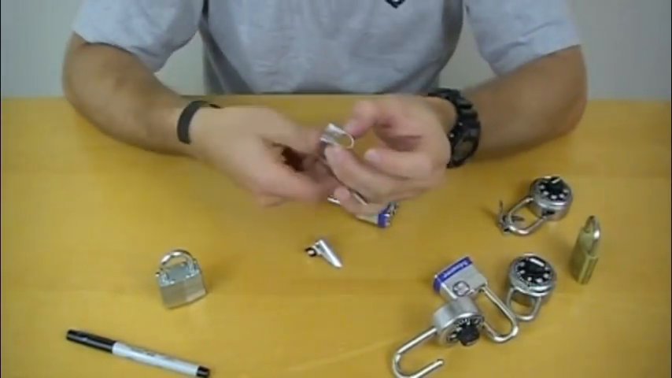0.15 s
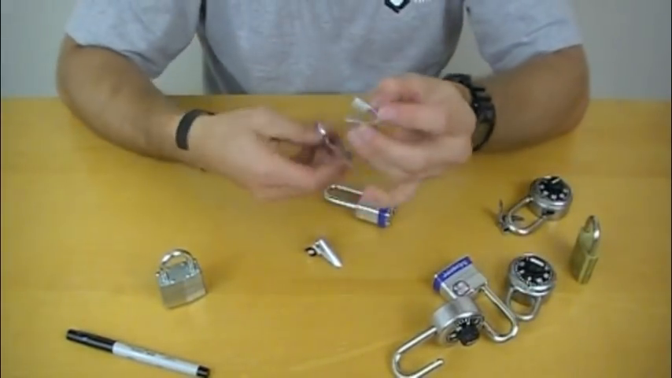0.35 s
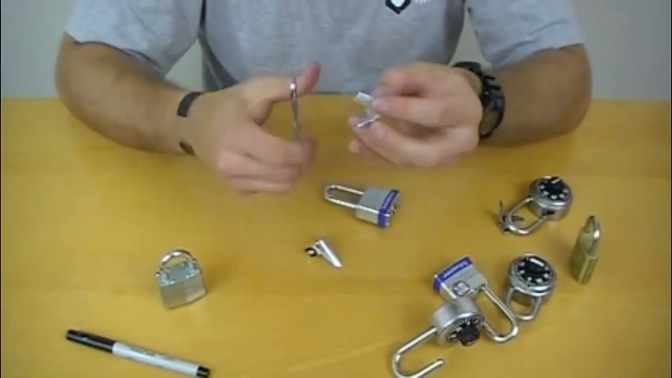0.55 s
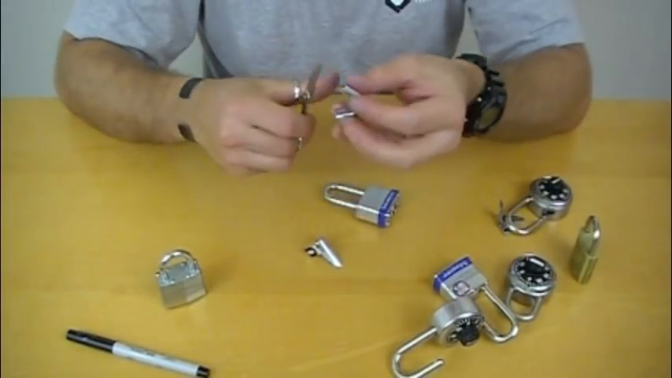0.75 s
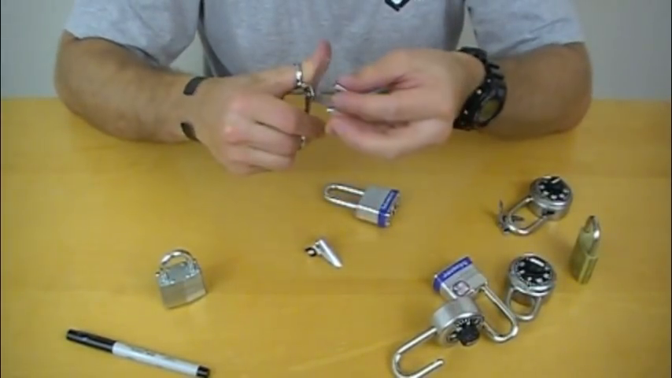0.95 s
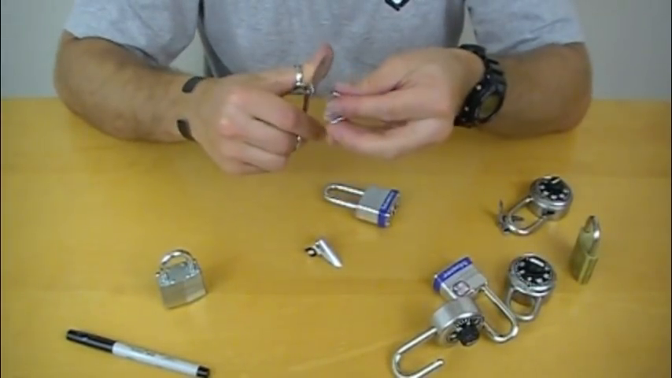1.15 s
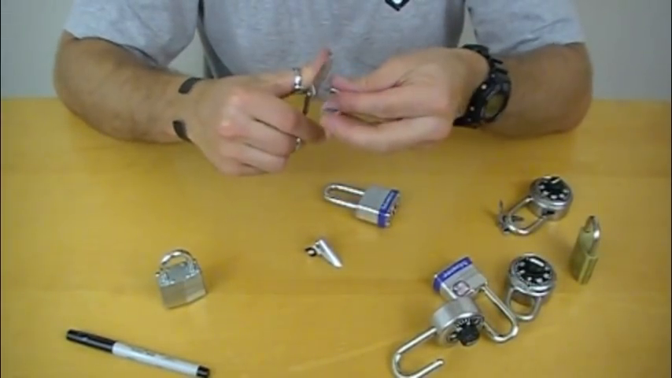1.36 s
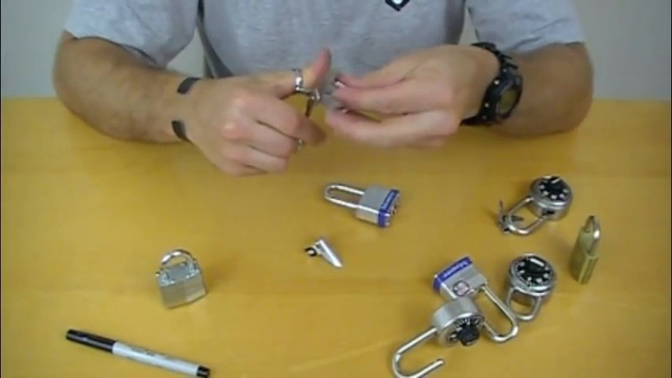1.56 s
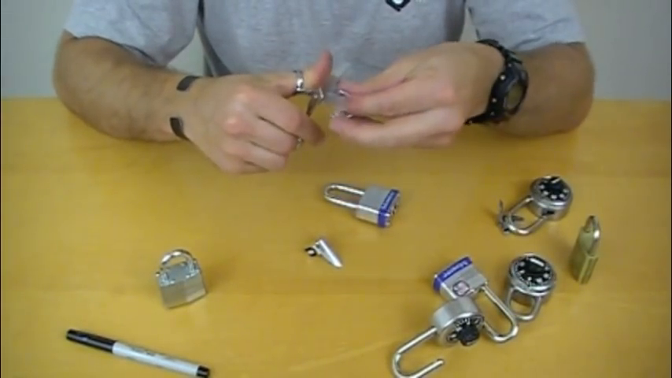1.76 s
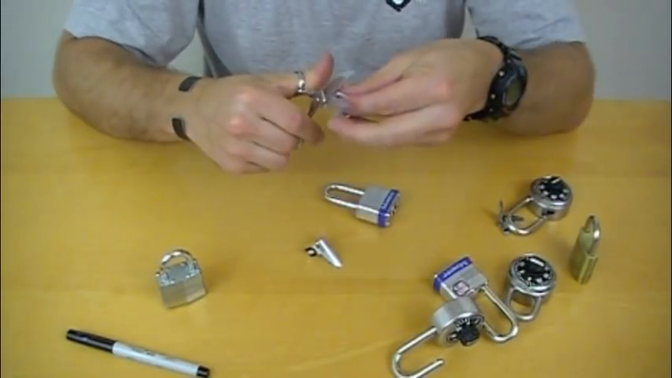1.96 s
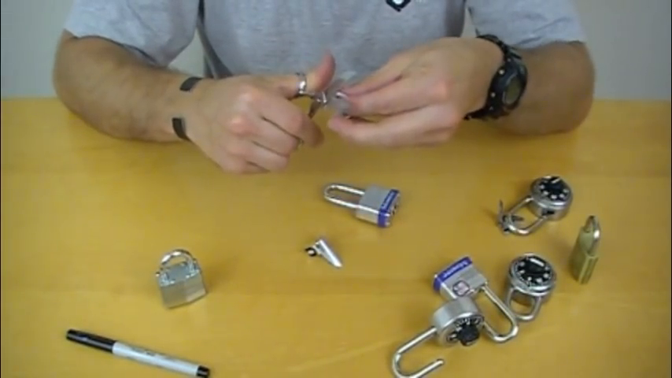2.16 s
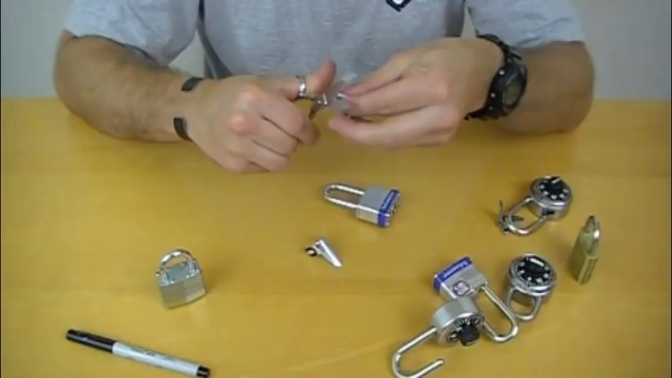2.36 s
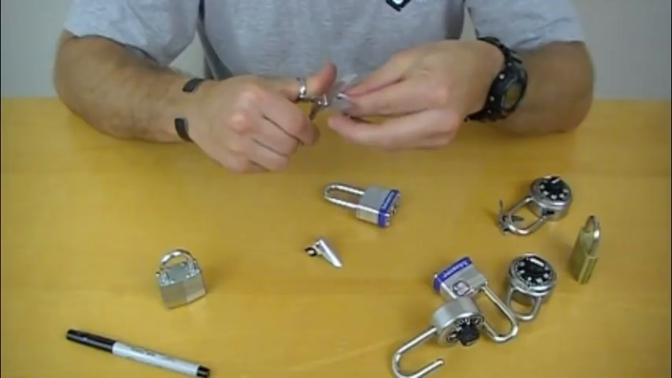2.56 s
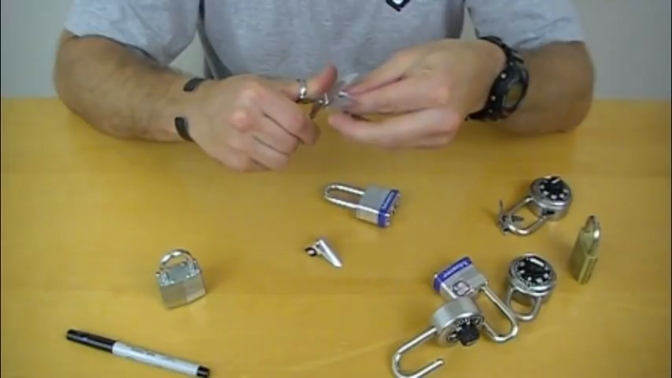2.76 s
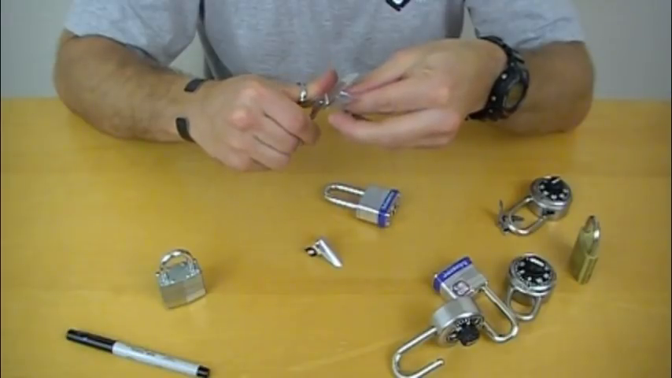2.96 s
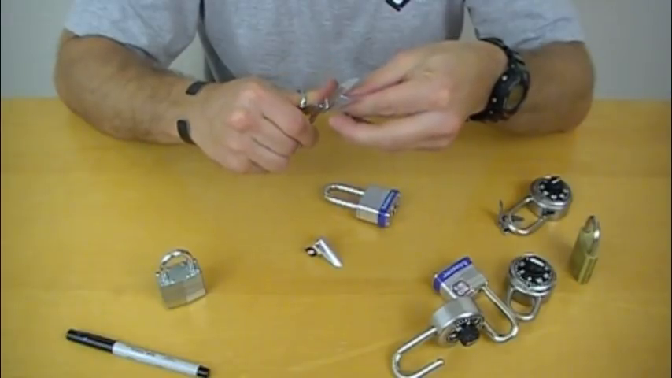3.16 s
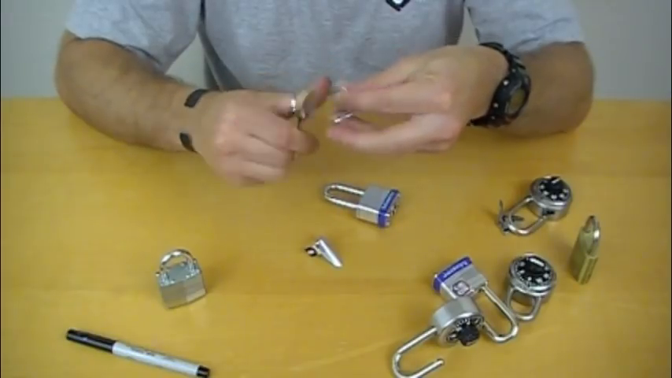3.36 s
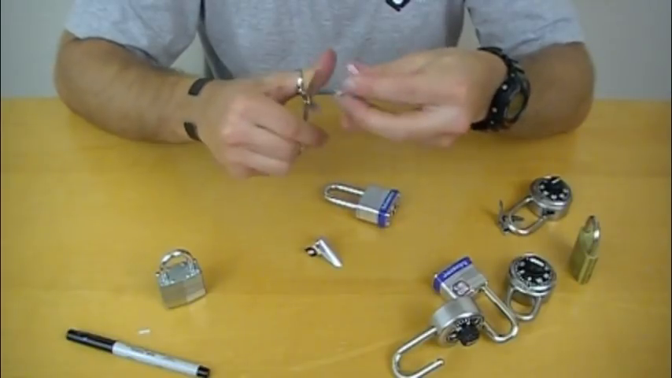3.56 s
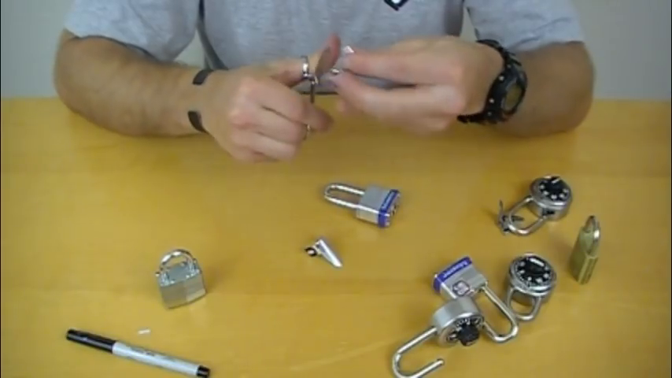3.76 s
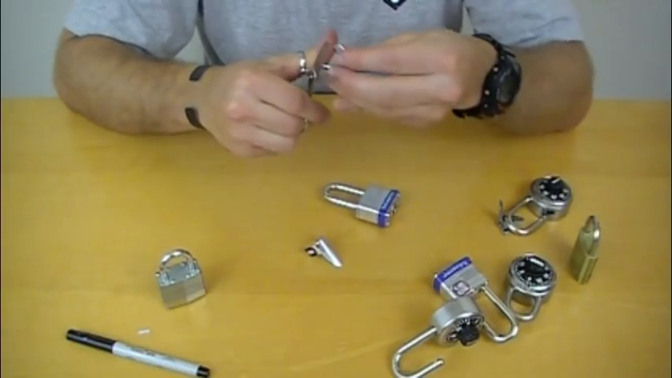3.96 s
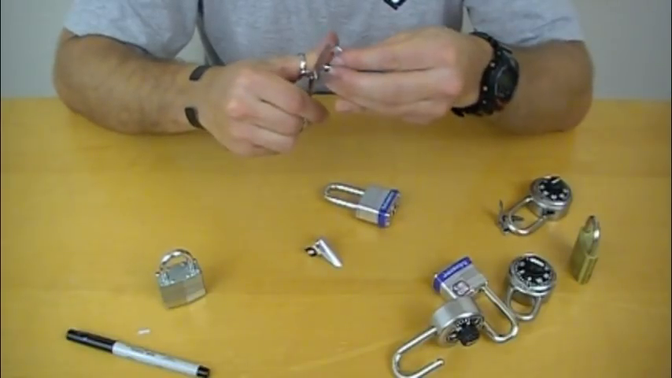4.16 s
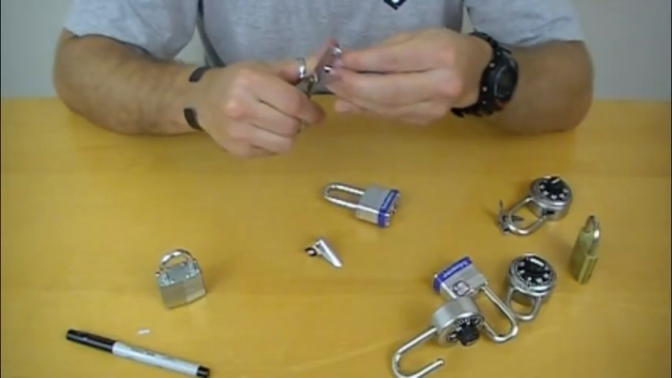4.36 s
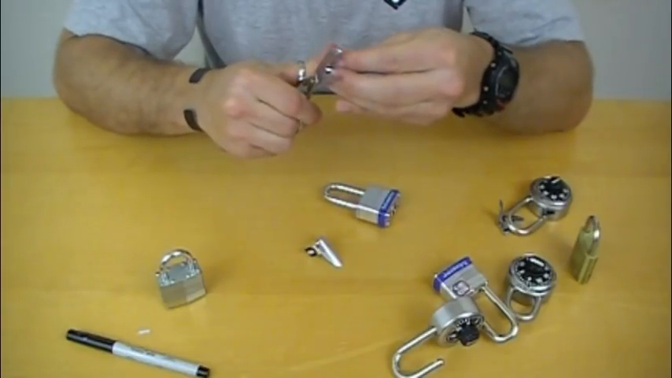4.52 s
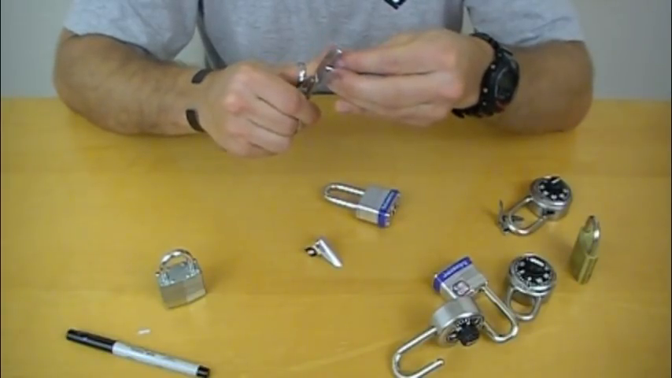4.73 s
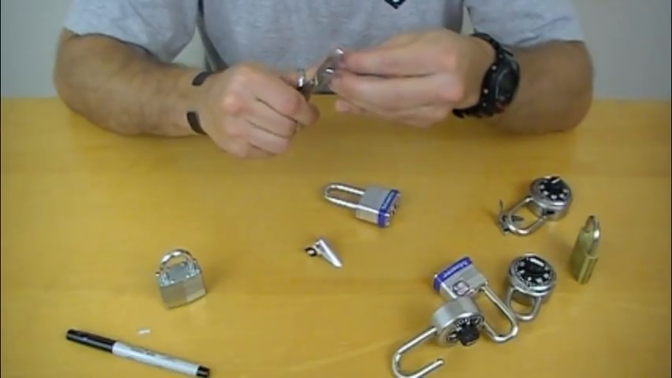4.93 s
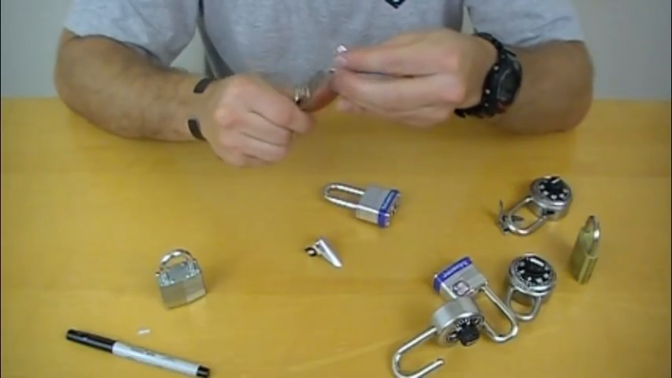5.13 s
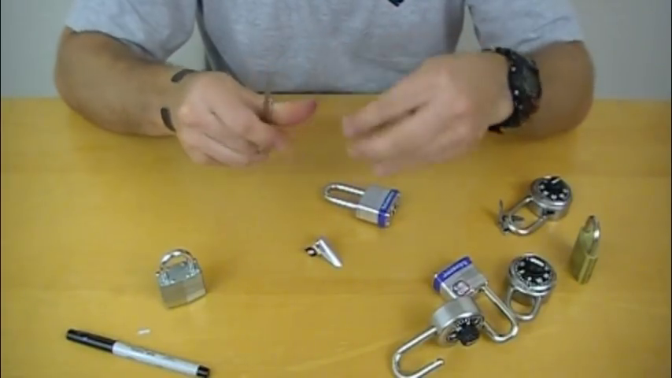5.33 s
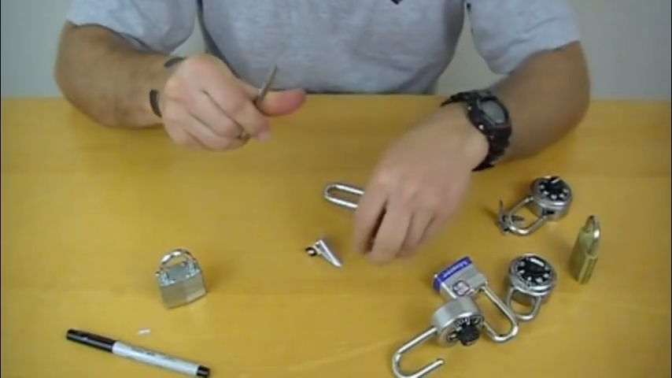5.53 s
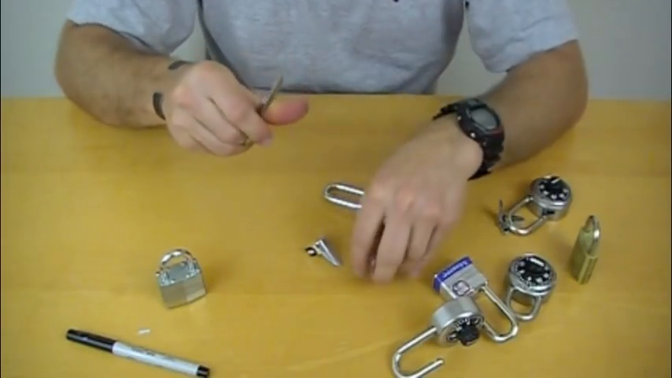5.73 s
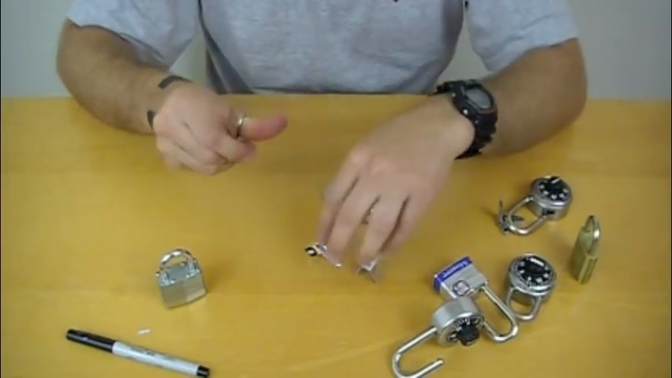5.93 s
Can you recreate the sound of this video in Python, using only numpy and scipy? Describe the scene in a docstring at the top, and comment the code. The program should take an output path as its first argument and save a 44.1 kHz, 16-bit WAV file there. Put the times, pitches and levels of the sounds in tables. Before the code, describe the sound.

A few sharp, irregular scissor snips in thin metal, with light clicks and finger rubbing, in a bare room with soft hiss.

```python
"""A bare room, over a wooden table: small scissors cut thin aluminium sheet, in stereo.
Each fracture shakes the sheet's modes and the cut flap; the blades ring as they meet.
Fingers and sheet rub, hands and offcuts knock on the wood, forearms jolt the table top.
Walls and room answer. Microphone hiss, strongest between the channels, carries a faint whine."""
import sys
import numpy as np
from scipy import signal
from scipy.fft import rfft, irfft, next_fast_len
from scipy.io import wavfile
from scipy.ndimage import map_coordinates

SR = 44100
rng = np.random.default_rng(int(sys.argv[2]) if len(sys.argv) > 2 else 0)


def int16_out(signal):
    """Quantize to a 16-bit WAV file."""
    q = np.round(np.clip(np.atleast_2d(signal).T, -1, 1) * 32767)
    wavfile.write(sys.argv[1], SR, q.astype(np.int16))


N = 268480

# modes of the blades (first row) and the sheet: (frequency [Hz], width [Hz], level [dB])
METAL_MODES = [(1580, 280, 4), (2430, 7200, 3.5), (3460, 1700, 4), (3984, 1800, -3), (5000, 1500, 2.5),
               (5790, 300, -5.5), (6470, 1200, -2), (7600, 1065, 0), (8890, 1300, -2.5), (9840, 1600, 1.5),
               (10570, 3100, 0.5), (12250, 1200, -9.5), (13500, 2100, -8.5)]


def amp(db):
    return 10 ** (np.asarray(db) / 20)


def unit_rms(x):
    return x / np.sqrt(np.mean(x ** 2) + 1e-20)


def log_interp(points, hz):
    """Curve through (Hz, value) points on a log frequency axis."""
    f, values = np.transpose(points)
    return np.interp(np.log(hz + 1), np.log(f + 1), values)


def filtered(x, response):
    """Apply a complex response, given as a function of Hz."""
    n = x.shape[-1]
    size = next_fast_len(n + 4096)
    return irfft(rfft(x, size) * response(np.fft.rfftfreq(size, 1 / SR)), size)[..., :n]


def noise(spectrum):
    """Coloured noise, rms 1."""
    return unit_rms(filtered(rng.standard_normal(N), lambda hz: amp(log_interp(spectrum, hz))))


def resonance(f, hz, width_hz):
    """Causal resonance, gain 1 at its centre."""
    return 1j * f * width_hz / (hz * hz - f * f + 1j * f * width_hz)


def low_cut(f, hz):
    return 1j * f / (hz + 1j * f)


def add(track, start_s, sound):
    track[round(start_s * SR):][:len(sound)] += sound


def with_energy(sound, db):
    """Scale to the energy of 1 ms at an rms level of db."""
    return amp(db) * np.sqrt(SR / 1000) / np.linalg.norm(sound) * sound


def hiss():
    """Noise of the microphone pair and an unsteady whine: (mid, side)."""
    # noise spectra and their treble roll-off: (frequency [Hz], relative density [dB])
    mid_spectrum = [(15, -62), (25, -30.5), (177, -11.5), (208, -11.5), (238, -8), (357, -2.5), (387, -3),
                    (419, -3), (479, -4), (865, -6), (963, -8), (1070, -6), (1400, -7.5), (2160, -8.5),
                    (15300, -24)]
    side_spectrum = [(15, -75), (25, -44.5), (75, -23.5), (164, -10), (320, -4.5), (454, -2.5), (506, -4),
                     (679, -2.5), (1400, -7.5), (2160, -11.5), (2530, -13.5), (15300, -35)]
    roll_off = [(11000, 0), (14800, -3), (15400, -20)]
    # whine: (frequency [Hz], mid level [dB], side level [dB])
    tones = [(1000, -83, -94), (1086, -80.5, -89), (2200, -84, -87)]
    floor = np.array([amp(-68.5) * noise(mid_spectrum), amp(-61.5) * noise(side_spectrum)])
    floor = filtered(floor, lambda hz: amp(log_interp(roll_off, hz)))
    for hz, *mid_side_db in tones:
        drift_rad = 0.011 * np.cumsum(rng.standard_normal(N))
        floor += amp(mid_side_db)[:, None] * np.sin(2 * np.pi * hz * np.arange(N) / SR + drift_rad)
    return floor


def rubs():
    """Friction, grainy on metal, smooth on skin and cloth; each stroke swells, then fades."""
    # strokes of fingers and sheet: (start [s], length [s], scrape [dB], skin and cloth [dB])
    strokes = [(0.02, 0.57, -68, -70), (0.502, 0.22, -69.5, -75), (0.671, 0.34, -75, -71),
               (0.939, 0.066, -51.5, -69), (1.448, 0.091, -68, -72), (1.572, 0.029, -60, -73.5),
               (3.983, 0.06, -58.5, -76), (4.86, 0.12, -72, -73.5), (5.01, 0.036, -62, -65.5),
               (5.612, 0.15, -72, -74), (5.754, 0.065, -67, -61), (5.802, 0.25, -61.5, -71)]
    # friction spectra: (frequency [Hz], relative density [dB])
    scrape_spectrum = [(1470, -22), (2500, -8.5), (2850, -4.5), (5750, -2), (6200, 0), (10100, -1.5),
                       (13100, -16), (15500, -61.5)]
    cloth_spectrum = [(60, -32.5), (130, -10.5), (350, -3.5), (1200, -2), (2500, -5), (5000, -28)]
    rise_share, release_s = 0.12, 0.022
    scrape_fade_db, cloth_fade_db = 11.5, 5.5  # per stroke length
    grit_db, grain_samples = 4, 64
    t, track = np.arange(N) / SR, np.zeros(N)
    roughness = rng.standard_normal(N // grain_samples + 4)
    grains = unit_rms(amp(grit_db * map_coordinates(roughness, [np.arange(N) / grain_samples])))
    scrape, cloth = grains * noise(scrape_spectrum), noise(cloth_spectrum)
    for start_s, length_s, scrape_db, cloth_db in strokes:
        progress = (t - start_s) / length_s
        touch = np.clip(np.minimum(progress / rise_share, (1 - progress) * length_s / release_s), 0, 1)
        fade = np.clip(progress - rise_share, 0, 1)
        track += touch * amp(scrape_db - scrape_fade_db * fade) * scrape
        track += touch * amp(cloth_db - cloth_fade_db * fade) * cloth
    return track


def sheet_cracks():
    """Fracture shakes the sheet's modes; the cut flap adds two rings: (near, to walls, all round)."""
    # blade on sheet: (time [s], decay [ms], level over 1 ms [dB], flap's high ring [Hz], its lift [dB],
    # fall below it [dB/octave], flap's low ring [Hz], its level against the rest [dB])
    contacts = [(0.06, 4.7, -54, 10100, 9.4, 5.5, 5900, -16), (0.2458, 1.4, -55, 7600, 3, 6.9, 5800, 6),
                (0.423, 2.5, -50.5, 8700, 3, 9, 4770, 10), (0.5702, 1.4, -51.5, 8700, 4.4, 19, 2900, -19),
                (0.9019, 1.7, -39, 10000, 13, 6, 3670, -4.5),
                (0.9114, 2.3, -26, 11750, 14, 6.2, 2650, -7.5),
                (0.923, 2, -22.5, 10400, 3.2, 2.5, 5900, -1.5), (0.961, 8.4, -32, 10200, 15, 5.4, 6250, 5),
                (0.9695, 3.8, -25, 9850, 15, 20, 6230, -15), (0.995, 0.77, -33, 6000, 10, 8, 3100, -7.5),
                (1.062, 1.9, -29, 10300, 3.2, 1, 3600, -5.5), (1.1305, 4.1, -22, 4370, 2.7, 6.6, 2950, -11),
                (1.2437, 3.4, -40, 9320, 24, 4.5, 5270, -4), (1.398, 1, -55, 9600, 6.8, 8.1, 5100, -7),
                (1.4045, 1.9, -49, 9700, 4, 4.1, 5000, -0.5),
                (1.4743, 3.1, -46.5, 7600, 3, 2.3, 5000, -0.5),
                (1.4842, 1.6, -47.5, 7340, 17, 6.9, 4960, -15), (1.499, 1.2, -43, 10300, 5, 3.1, 5130, -1),
                (1.519, 1.2, -52, 7000, 4, 9, 4900, -12), (1.582, 0.96, -42.5, 8600, 8, 3.2, 5960, -11),
                (1.635, 0.83, -14, 8390, 17.2, 8.1, 2800, -29.5),
                (1.9924, 4.8, -54, 8800, 6.2, 4, 4630, -2), (3.2302, 2.8, -33.5, 5000, 3, 4.2, 3840, -12),
                (3.2334, 1.9, -14.5, 5200, 4.1, 15, 2390, -13.5),
                (3.3923, 4.1, -30, 9100, 3.5, 6.6, 2230, -20), (3.536, 1, -39.5, 9500, 7.1, 5.3, 5030, -10),
                (3.984, 3.1, -50.5, 11000, 23, 8, 4480, -5.5),
                (4.075, 0.89, -45.5, 7300, 9, 8.1, 4670, -14.5), (4.2054, 5.9, -53, 8360, 4, 5, 5300, 0),
                (4.2887, 3.3, -58, 10950, 5, 5, 5120, -1.5), (4.305, 2.2, -58, 7460, 2.6, 5.5, 4410, -14),
                (4.8804, 2.7, -57, 8000, 3.8, 4, 5200, -2), (4.976, 0.91, -45, 8900, 2.5, 15, 6200, -25),
                (5.0123, 1.3, -53, 9200, 4, 3, 5100, -7), (5.0266, 6.4, -53, 11000, 3, 5, 5500, -8),
                (5.0344, 2.5, -29.5, 9000, 2.5, 1.7, 5300, -9),
                (5.0369, 0.89, -10.5, 10900, 3.6, 8, 5130, -2.5),
                (5.2814, 1.6, -55.5, 7200, 4, 3.3, 5220, -11), (5.2872, 0.9, -50.5, 7670, 1, 4.3, 2590, -8),
                (5.4425, 0.39, -38.5, 9330, 11, 3.8, 2845, -12.5),
                (5.631, 3, -52.5, 8500, 8.6, 10.5, 6300, -9.5),
                (5.7409, 1.6, -32.5, 7170, 15, 9, 3200, -13.5), (5.7543, 4.3, -37.5, 8500, 6, 7, 3130, -9),
                (5.772, 1.4, -35.5, 7000, 17, 5.2, 3660, -10.5),
                (5.7814, 2.4, -33, 8840, 21, 4.8, 3370, -8)]
    # throw towards the walls as the sheet is turned: (time [s], level against near [dB])
    wall_throw = [(0.9, -5), (1.7, -0.5), (3.3, -2.7), (4.9, 2.5), (5.04, -12), (5.4, -3.2), (5.8, -2)]
    fall_above_db_oct, high_width_hz = 5.5, 280
    low_width, low_skirt, radiation_edge = 0.19, 0.46, 0.55  # shares of the low ring's frequency
    near, to_walls, around = np.zeros((3, N + SR))
    t = np.arange(2048) / SR
    impulse = 1. * (t == 0)
    mode_hz, width_hz, mode_db = np.transpose(METAL_MODES[1:])
    polarity = (-1.) ** np.arange(len(mode_hz))  # neighbours add up between their peaks
    for start_s, decay_ms, db, high_hz, lift_db, fall_below_db_oct, low_hz, low_db in contacts:
        age = 1000 * t / decay_ms
        crackle = (1 - np.exp(-age / .15)) * np.exp(-age) * rng.standard_normal(len(t))
        octaves = np.log2(mode_hz / high_hz)
        drive_db = np.where(octaves < 0, fall_below_db_oct, -fall_above_db_oct) * octaves
        weights = polarity * amp(mode_db + drive_db + rng.normal(0, 2.6, len(mode_hz)))

        def radiation(f):
            high_ring = 1 + (amp(lift_db) - 1) * resonance(f, high_hz, high_width_hz)
            return high_ring * low_cut(f, radiation_edge * low_hz)  # a small sheet sheds little bass

        def low_ring(f):
            return resonance(f, low_hz, low_width * low_hz) * resonance(f, low_hz, low_skirt * low_hz)

        def shaken(push):
            modes = filtered(push, lambda f: resonance(f, mode_hz[:, None], width_hz[:, None]) ** 2)
            modes /= np.linalg.norm(modes, axis=1, keepdims=True)
            sheet = unit_rms(filtered(weights @ modes, radiation))
            flap = unit_rms(filtered(push, low_ring))
            return with_energy(sheet + amp(low_db) * flap, db)

        crack = shaken(crackle)
        add(near, start_s, crack)
        add(to_walls, start_s, amp(np.interp(start_s, *np.transpose(wall_throw))) * crack)
        add(around, start_s, shaken(impulse))  # smoother, as averaged over all directions
    return np.array([near, to_walls, around])[:, :N]


def knocks():
    """A dull push rings briefly in the wood and rattles; little deep bass comes through."""
    # knocks through hand and table: (time [s], level [dB], pitch [Hz])
    hits = [(0.92, -52, 623), (1.13, -47.5, 490), (1.607, -56, 1100), (1.633, -74, 700), (3.2333, -34, 469),
            (3.854, -51.5, 800), (3.867, -56, 791), (3.885, -53, 818), (5.0369, -36.5, 490),
            (5.759, -56, 860), (5.786, -50, 436)]
    attack_s, t60_s = 0.00044, 0.022
    track, t = np.zeros(N + SR), np.arange(8192) / SR
    for start_s, db, hz in hits:
        rattle = filtered(rng.standard_normal(len(t)), lambda f: resonance(f, 1.25 * hz, 0.78 * hz) ** 2)
        wood = 1.37 * np.sin(2 * np.pi * hz * t) + 0.91 * unit_rms(rattle)
        envelope = amp(db - 60 * t / t60_s) * (1 - np.exp(-t / attack_s))
        add(track, start_s, envelope * wood)
    return filtered(track[:N], lambda f: low_cut(f, hz=200) ** 3)


def blade_rings():
    """The blades meet and ring in their lowest mode, which the grip otherwise damps."""
    # blades shutting: (time [s], level over 1 ms [dB])
    shuts = [(0.922, -50.5), (1.132, -40), (1.635, -39.5), (3.2335, -26.5), (3.392, -53), (5.037, -31),
             (5.2861, -53)]
    hz, width_hz, _ = METAL_MODES[0]
    top_hz = 3000
    track, impulse = np.zeros(N + SR), 1. * (np.arange(2048) == 0)

    def response(f):
        return resonance(f, hz, width_hz) * top_hz / (top_hz + 1j * f) * low_cut(f, hz=800)

    ring = filtered(impulse, response)
    for start_s, db in shuts:
        add(track, start_s, with_energy(ring, db))
    return track[:N]


def table_thumps():
    """Forearms jolt the table top as the blades slam shut; its lowest modes swell and die."""
    # jolts: (time [s], level [dB])
    jolts = [(3.241, -60), (5.039, -66)]
    attack_s, t60_s = 0.0066, 0.18
    track, t = np.zeros(N + SR), np.arange(SR // 2) / SR
    modes = sum(gain * np.sin(2 * np.pi * hz * t) for hz, gain in [(110, 1), (78, .6), (145, .45)])
    for start_s, db in jolts:
        envelope = amp(db - 60 * t / t60_s) * (1 - np.exp(-t / attack_s))
        add(track, start_s, envelope * modes)
    return track[:N]


def room(to_walls, around):
    """Early wall echoes and a diffuse tail, drawn anew for each 1/8 s of sound: (mid, side)."""
    # wall echoes: (delay [ms], level [dB])
    echoes = [(4.5, -21), (7.5, -9), (10.6, -10), (15, -23.5), (24, -17.5)]
    # tail decay: (frequency [Hz], T60 [s])
    decay = [(300, 0.6), (800, 0.4), (2100, 0.32), (5500, 0.35), (9000, 0.34), (14600, 0.2)]
    # tail colour: (frequency [Hz], relative level [dB])
    mid_colour = [(300, -4), (1000, -0.5), (2000, -1.5), (3800, -2.5), (5500, -3.5), (9000, -8),
                  (14000, -7.5)]
    side_colour = [(300, -7.5), (2000, -17), (3500, -21), (5500, -15), (10000, -9), (14000, -2.5)]
    build_up_s = np.array([[.005], [.003]])  # mid, side
    wet, block = np.zeros((2, N + 2 * SR)), SR // 8
    for start in range(0, N, block):
        hz, t, spectra = signal.stft(rng.standard_normal((2, SR // 2)), SR, nperseg=256)
        colour = amp([log_interp(mid_colour, hz), log_interp(side_colour, hz)])[:, :, None]
        fade = amp(-60 * t / log_interp(decay, hz)[:, None])
        _, tail = signal.istft(spectra * colour * fade, SR, nperseg=256)
        tail *= amp(-31) * (1 - np.exp(-np.arange(tail.shape[1]) / SR / build_up_s))
        answer = signal.fftconvolve(around[None, start:start + block], tail, axes=1)
        wet[:, start:start + answer.shape[1]] += answer
    for k, (delay_ms, db) in enumerate(echoes):
        delay = round(delay_ms * SR / 1000)
        gains = amp([[db], [db - 3.5]]) * [[1], [(-1) ** k]]  # left and right in turn
        wet[:, delay:delay + N] += gains * to_walls
    return wet[:, :N]


def scene():
    """Sum the sources on three paths (near, to walls, all round), then mid/side to left/right."""
    wood = amp([[0], [-4], [-5]]) * knocks()  # hands and table muffle these towards the room
    metal = sheet_cracks() + amp([[0], [-6], [-4]]) * blade_rings()
    near, to_walls, around = metal + wood + rubs()
    direct_side = amp(-19) * np.roll(around, 9)  # a little arrives from one side
    direct = np.array([near + table_thumps(), direct_side])
    mid, side = direct + room(to_walls, around) + hiss()
    return np.array([mid + side, mid - side])


def record(dry):
    """Band limit: a steep treble slope, then nothing."""
    edge_hz, stop_hz, hz_per_db = 15700, 16600, 25
    return filtered(dry, lambda hz: amp(-np.maximum(hz - edge_hz, 0) / hz_per_db) * (hz < stop_hz))


dry = scene()
out = record(dry)
int16_out(out)
```